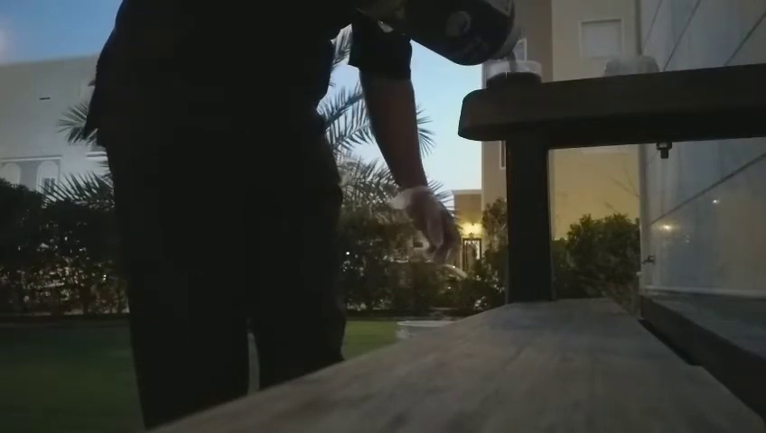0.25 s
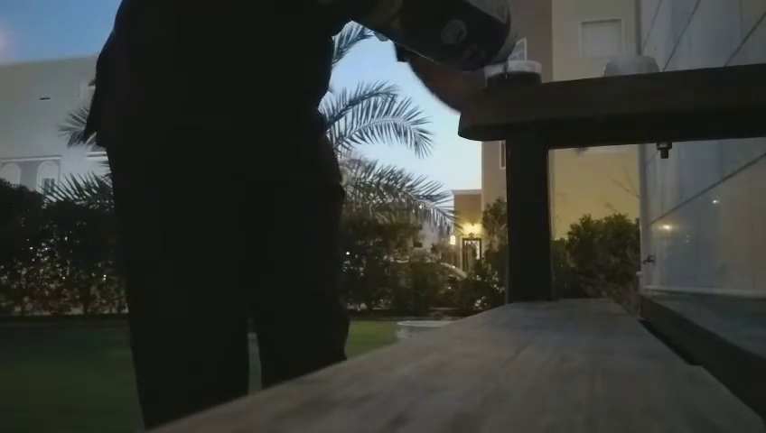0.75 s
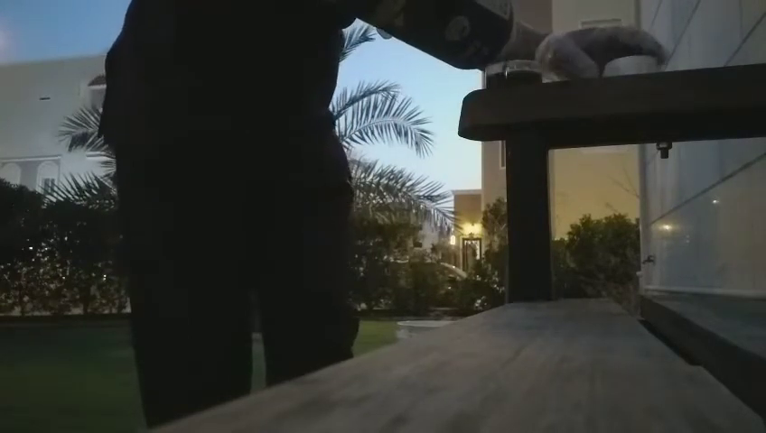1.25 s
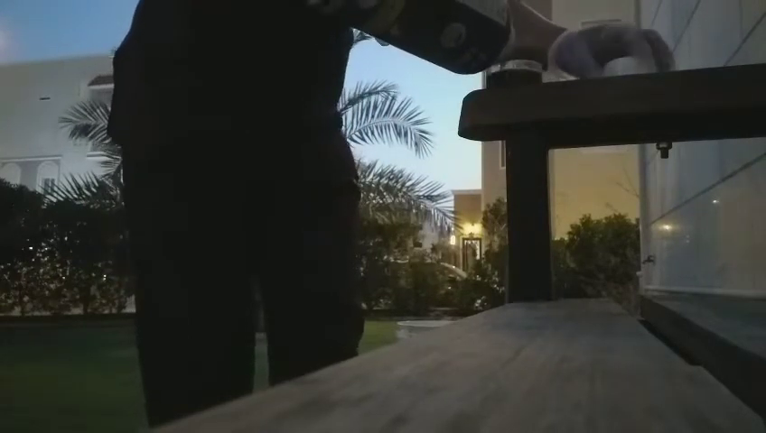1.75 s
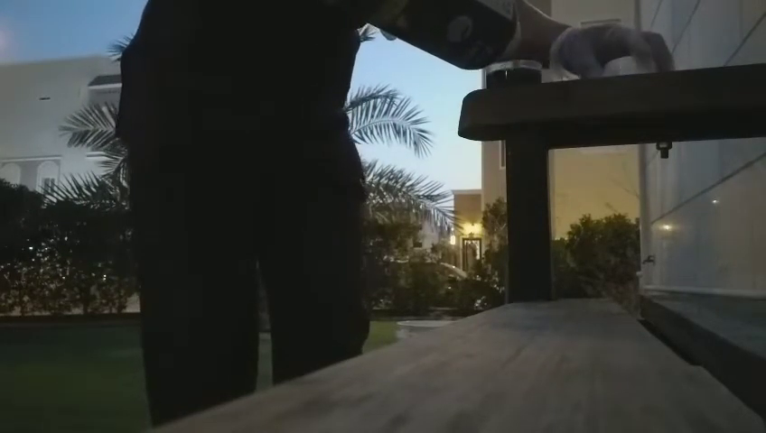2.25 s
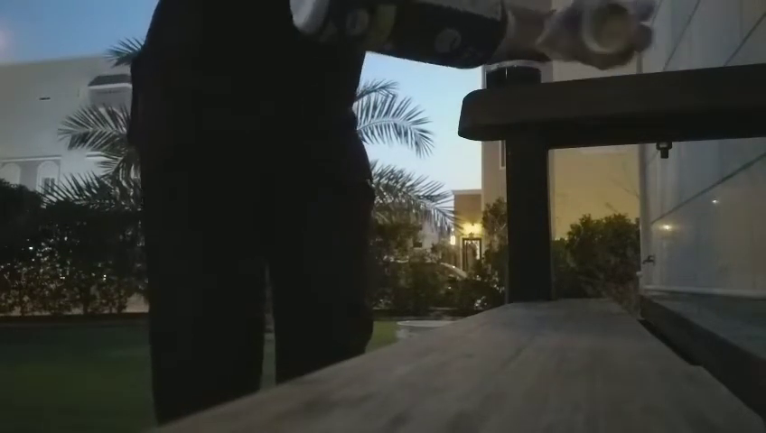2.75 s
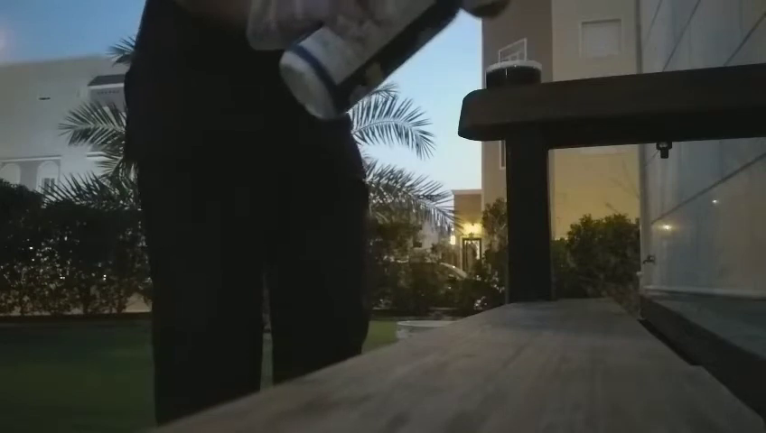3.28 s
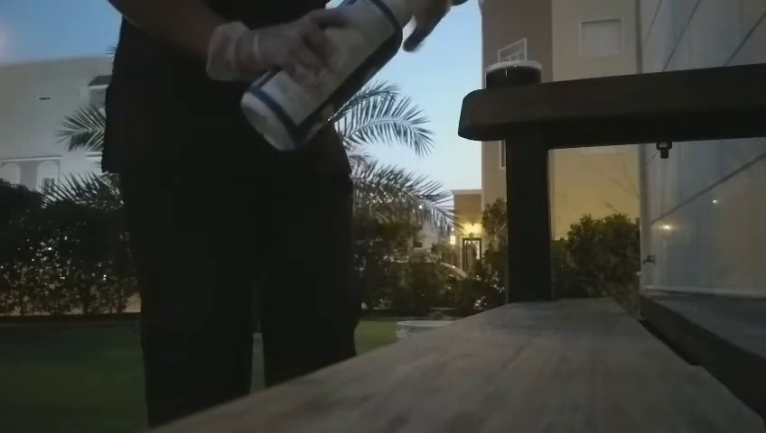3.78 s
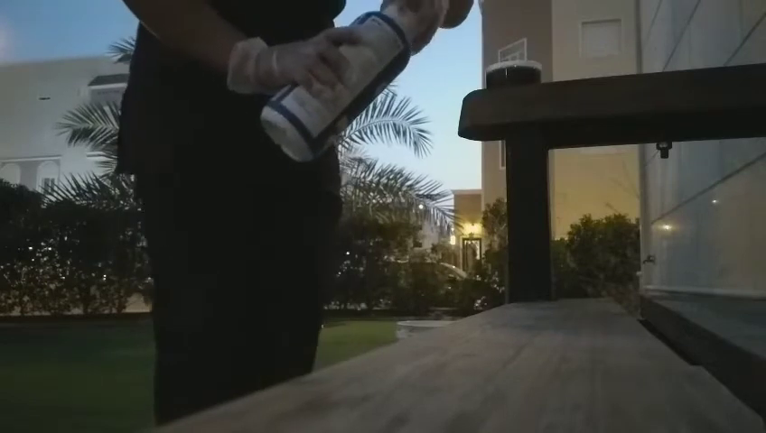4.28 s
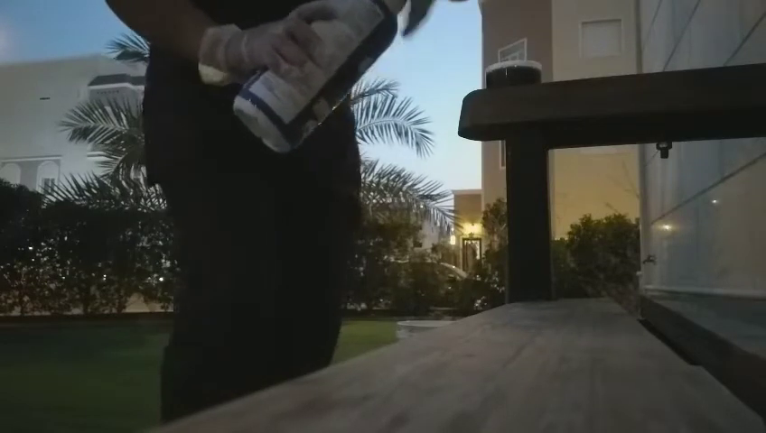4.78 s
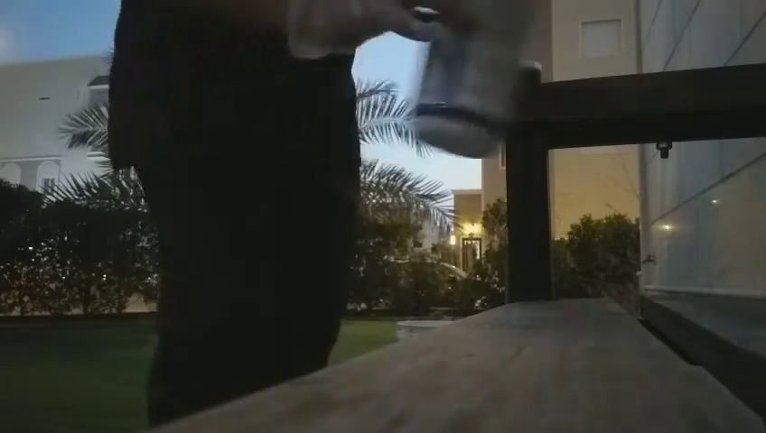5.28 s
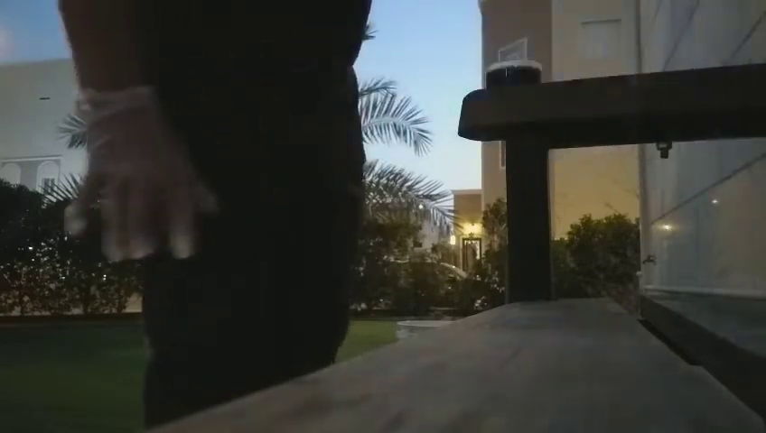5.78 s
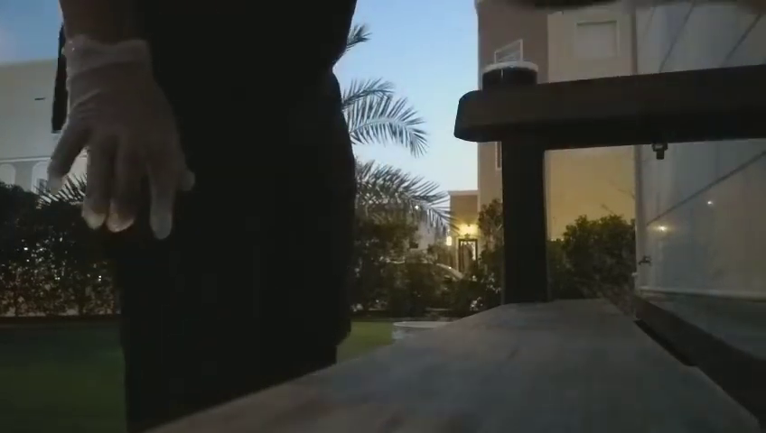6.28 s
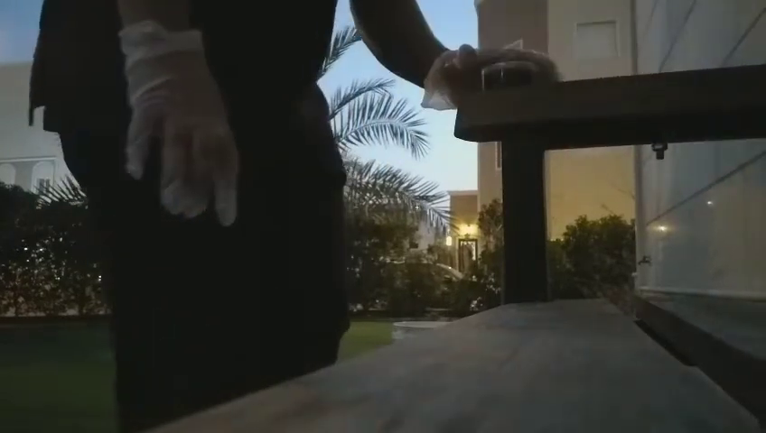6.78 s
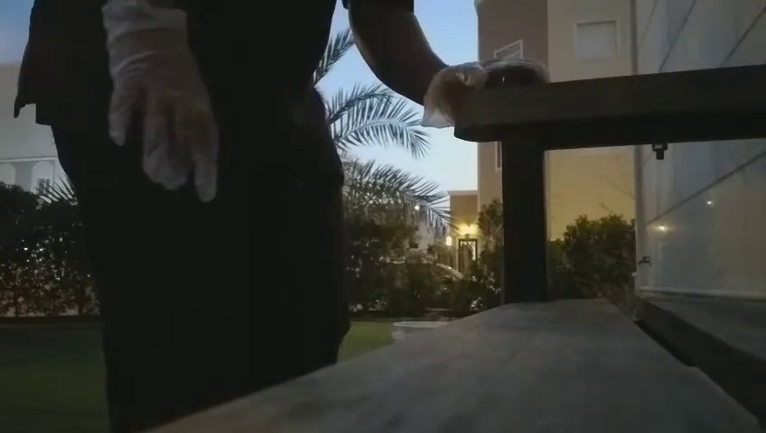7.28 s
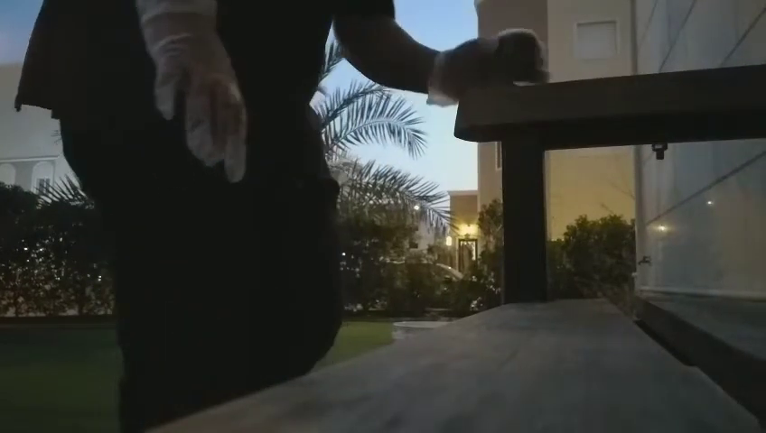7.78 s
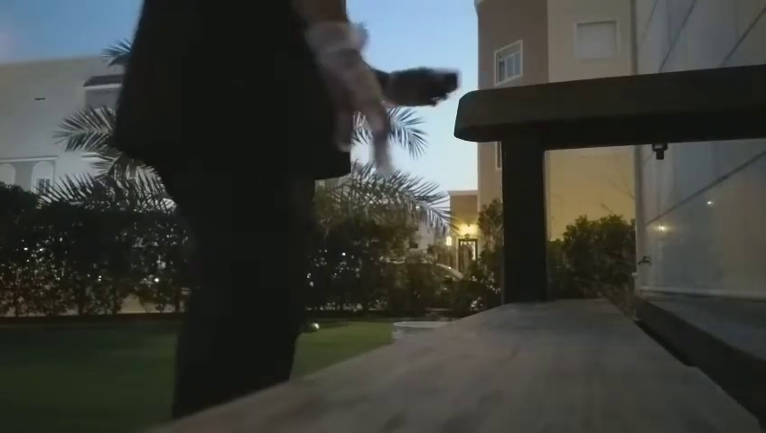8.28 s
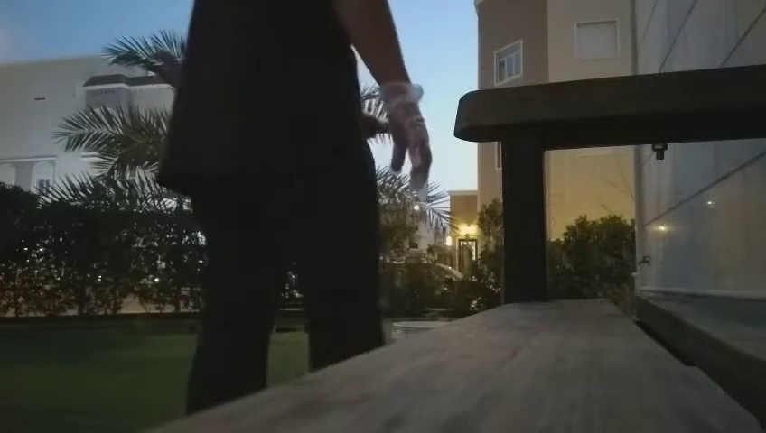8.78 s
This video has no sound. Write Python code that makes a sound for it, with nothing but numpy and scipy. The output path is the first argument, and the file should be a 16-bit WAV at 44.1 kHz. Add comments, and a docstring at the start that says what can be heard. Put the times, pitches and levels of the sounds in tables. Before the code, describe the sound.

A garden at dusk, with the microphone close to a wooden bench. From 0 s a jet-like turbine whines, fuzzy high tones around a thin whistle over rushing air and deep far rumble. It rises slightly, is strongest around 1.3-1.9 s, then drops in pitch and dissolves by about 2.8 s, a low drone coasting down with it. Rumble remains, with faint airy residue and low, beating fan hum. At 3.2-3.5 s a canister lid clicks, the sharpest at 3.48 s, ringing briefly and hollowly. Gritty glove rubbing and smaller clicks continue until 5.1 s. At 5.9 s the canister hits the planks: a loud, woody boom with hard bounces and fast rattling, then a short slide near 6.15 s. Background level ducks for about a second, then recovers. Soft foot scuffs come at 6.3, 7.8, 8.4-8.5 and 9 s over quiet hum and rumble.

```python
"""Garden turbine and a canister on a bench

A jet-like turbine, smeared blade tones over rushing air, whines above a far rumble, then winds down.
Beating tones of air-conditioner fans hum on. Near the microphone, gloved hands rub and twist the lid of
a canister (grainy noise) that clicks and rings; the canister lands on a wooden bench, which booms in
decaying modes. The knock ducks the recorder's gain for about a second, and feet scuff the ground."""
import sys
import numpy as np
from scipy import signal
from scipy.fft import rfft, irfft, next_fast_len
from scipy.io import wavfile
from scipy.ndimage import uniform_filter1d, minimum_filter1d, map_coordinates

SR = 44100
rng = np.random.default_rng(int(sys.argv[2]) if len(sys.argv) > 2 else 0)


def to_wav(s):
    """Save 16-bit WAV."""
    ch = np.atleast_2d(s).T  # columns
    pcm = np.round(np.clip(ch, -1, 1) * 32767)  # PCM
    wavfile.write(sys.argv[1], SR, pcm.astype(np.int16))


N = 399087
T = np.arange(N) / SR


def gain_of(db):
    """Decibels to amplitude."""
    return 10 ** (np.asarray(db) / 20)


def evened(x):
    """Scales to rms 1."""
    return x / np.sqrt(np.mean(x ** 2) + 1e-20)


def read(points, hz):
    """Reads a spectrum on a log-frequency axis."""
    f, value = np.transpose(points)
    return np.interp(np.log(hz + 1), np.log(f + 1), value)


def follow(rows):
    """Each column of a curve, at every sample."""
    s, *columns = np.transpose(rows)
    return [np.interp(T, s, c) for c in columns]


def add(mix, s, sound):
    """Mixes a sound in at time s."""
    part = mix[round(s * SR):][:len(sound)]
    part += sound[:len(part)]


def colour(x, spectrum):
    """Gives x a spectrum, at rms 1."""
    size = next_fast_len(len(x))
    shape = gain_of(read(spectrum, np.fft.rfftfreq(size, 1 / SR)))
    return evened(irfft(rfft(x, size) * shape, size)[:len(x)])


def band(x, hz, kind, order=2):
    """Causal low-pass or high-pass."""
    return signal.sosfilt(signal.butter(order, min(hz, SR / 2 - 1), kind, fs=SR, output="sos"), x)


def wander(per_s):
    """Smooth chance of rms 1 that changes about per_s times a second."""
    knots = rng.standard_normal(2 ** 14)
    return evened(map_coordinates(knots, [T * per_s], order=2, mode="wrap"))


def ring(modes, t):
    """Modes that lose 60 dB in their t60, each starting at a chance phase."""
    out = 0
    for hz, db, t60 in modes:
        out = out + gain_of(db - 60 * t / t60) * np.sin(2 * np.pi * (hz * t + rng.random()))
    return out


def stroke(centre, length, db):
    """A smooth rise and fall of level, such as one rubbing movement."""
    return gain_of(db) * np.cos(np.pi * np.clip((T - centre) / length, -.5, .5)) ** 2


# colour of the far roar: (frequency [Hz], relative density [dB per Hz])
RUMBLE_SPECTRUM = [(20, -29), (36, -22), (50, -4.5), (75, -4.5), (105, 3.5), (150, 2), (200, -1),
                   (380, -0.5), (520, -4), (640, -7), (1000, -12), (1250, -15), (2000, -21), (2700, -34.5),
                   (4200, -40.5), (5200, -54), (16000, -83.5)]
# the middle of the far roar: (time [s], level [dB])
ROAR_CURVE = [(0, -35), (1.76, -35), (2.9, -41), (5.8, -40.5), (7.4, -42.5), (9.05, -41.5)]


def rumble(bass_db=-40.0, split_hz=230, gust_db=-0.5, waver_db=1.92):
    """Far roar: the deep part holds nearly steady while the middle fades and wavers in the air."""
    level_db, = follow(ROAR_CURVE)
    noise = colour(rng.standard_normal(N), RUMBLE_SPECTRUM)
    deep = band(noise, split_hz, "low", order=3)
    middle = band(noise, split_hz, "high", order=3)
    deep_db = bass_db + gust_db * wander(8.1)
    middle_db = level_db + waver_db * wander(4.9)
    return deep * gain_of(deep_db) + middle * gain_of(middle_db)


# faint moans in the far roar: (frequency [Hz], width [Hz], centre time [s], length [s], level [dB])
MOAN_BANDS = [(529, 39, 0.41, 1.74, -43.5), (1490, 45, 0.22, 1.1, -52.5), (1670, 50, 1.27, 1.5, -53.5)]


def moans():
    """Narrow bands of noise in the roar that swell and sink."""
    out = np.zeros(N)
    for hz, width_hz, centre, length, db in MOAN_BANDS:
        swirl = band(rng.standard_normal(N) + 1j * rng.standard_normal(N), width_hz, "low")
        moan = evened((swirl * np.exp(2j * np.pi * hz * T)).real)
        out += moan * stroke(centre, length, db)
    return out


# colour of the rushing air: (frequency [Hz], relative density [dB per Hz])
RUSH_SPECTRUM = [(400, -7.5), (1000, -1.5), (1800, 8), (2800, 7), (4200, 2.5), (6000, -8.5), (9100, -13.5),
                 (10200, -33), (12500, -30.5), (15000, -50)]
# the turbine's run: (time [s], blade rate [Hz], whine level [dB], rush level [dB])
TURBINE_RUN = [(0, 2315, -49, -48.5), (.45, 2362, -45, -47), (1.1, 2405, -46.5, -45.5),
               (1.36, 2420, -41.5, -44), (1.72, 2396, -44, -47.5), (1.9, 2345, -41.5, -48),
               (2.04, 2055, -44.5, -46), (2.18, 1935, -48, -51.5), (2.33, 1760, -55.5, -54),
               (2.8, 1720, -71, -58.5), (3.25, 2010, -62, -57.5), (4.2, 1955, -67, -62),
               (5.15, 1893, -66.5, -68.5), (5.7, 1810, -81, -72), (9.05, 1800, -96, -73)]
FULL_HZ, FULL_DB = 2410, -41.5  # blade rate and whine level at full power
# top of the rush at full power [dB]; dB lost per dB of whine; what remains [dB]
TOP_DB, TOP_SLOPE, TOP_FLOOR_DB = -48.5, 0.83, -92


def rush(split_hz=5000):
    """Turbulent air; its top dies with the whine as the turbine slows."""
    _, whine_db, rush_db = follow(TURBINE_RUN)
    top_gain = gain_of(TOP_DB + TOP_SLOPE * (whine_db - FULL_DB))
    top_gain = np.hypot(top_gain, gain_of(TOP_FLOOR_DB))
    noise = colour(rng.standard_normal(N), RUSH_SPECTRUM)
    body = band(noise, split_hz, "low", order=5)
    top = evened(band(noise, split_hz, "high", order=5))
    return (body * gain_of(rush_db) + top * top_gain) * gain_of(0.47 * wander(14))


CORE_DB, CORE_SLOPE = -45.5, 1.6  # clean whistle at full power [dB]; dB lost per dB of whine
BLADE_DB, BLADE_SLOPE = -59.5, 12  # deepest blade tone at full speed [dB]; dB lost per dB of speed
# the deepest tone swells once, near top speed
BLADE_SWELL_S, BLADE_SWELL_LENGTH_S, BLADE_SWELL_DB = 1.3, 0.54, -51


def whine(width_hz=145, third_db=-7.0, third_fade=1.0, broken_hz=280, firm_db=-45):
    """Blade tones smeared by turbulence, with a thin clean core that needs full power."""
    blade_hz, level_db, _ = follow(TURBINE_RUN)
    phase = 2 * np.pi * np.cumsum(blade_hz * (1 + 0.0037 * wander(18))) / SR

    def smeared(order, spread_hz):
        """A fuzzy whistle on one multiple of the blade rate."""
        swirl = rng.standard_normal(N) + 1j * rng.standard_normal(N)
        swirl = band(swirl, spread_hz, "low", order=1)
        swirl = band(swirl, 3 * spread_hz, "low", order=1)
        return evened((swirl * np.exp(1j * order * phase)).real)

    # the upper tone is lost once the whine is weak
    upper_db = third_db + third_fade * np.minimum(level_db + 59, 0)
    upper_gain = gain_of(upper_db + 1.05 * wander(14.1))
    tones = smeared(order=2, spread_hz=width_hz)
    tones = tones + upper_gain * smeared(order=3, spread_hz=0.89 * width_hz)
    # a weak whine dissolves into a wide band
    breakup = np.clip((firm_db - level_db) / 12, 0, .85)
    tones = np.sqrt(1 - breakup) * tones + np.sqrt(breakup) * smeared(order=2, spread_hz=broken_hz)
    core_db = CORE_DB + CORE_SLOPE * (level_db - FULL_DB) + 2.8 * wander(12)
    first_db = BLADE_DB + BLADE_SLOPE * 20 * np.log10(blade_hz / FULL_HZ) + 3.3 * wander(8.9)
    first_gain = gain_of(first_db) * (1 - breakup)
    first_gain = first_gain + stroke(BLADE_SWELL_S, BLADE_SWELL_LENGTH_S, BLADE_SWELL_DB)
    core = gain_of(core_db) * np.sin(2 * phase) + first_gain * np.sin(phase)
    return tones * gain_of(level_db + 1.53 * wander(16)) + np.sqrt(2) * core


# the drone holds, then coasts down and shakes hardest as it passes a resonance
DRONE_HZ, DRONE_DB = 103.3, -49.5
COAST_FROM_S, COAST_S, COAST_DB_PER_S = 2.03, .66, 27  # start, time constant, loss
SHAKE_HZ, SHAKE_WIDTH_HZ, SHAKE_DB = 72, 16, 13.5


def drone(waver_hz=3, flutter_db=3.0):
    """A low tone that coasts down as the whine falls, swelling through a resonance on the way."""
    coasting = np.maximum(T - COAST_FROM_S, 0)
    hz = DRONE_HZ * np.exp(-coasting / COAST_S)
    shake_db = SHAKE_DB * np.exp(-((hz - SHAKE_HZ) / SHAKE_WIDTH_HZ) ** 2)
    level_db = DRONE_DB - COAST_DB_PER_S * coasting + shake_db
    tone = np.sin(2 * np.pi * np.cumsum(hz + waver_hz * wander(21.6)) / SR)
    return np.sqrt(2) * tone * gain_of(level_db + flutter_db * wander(14))


# hum of the air conditioner, compressor (first two rows) and fans: (frequency [Hz], waver [Hz], level outside
# the swell [dB], swell start [s], swell end [s])
HUM_TONES = [(53.5, 0.55, -66.5, 2.8, 4.9), (108.4, 3.1, -59, 2.2, 8.0), (253.4, 2.317, -54.5, 1.1, 8.4),
             (257.2, 1.16, -52, 1.2, 8.84), (313.8, 3.184, -53, 1.4, 4.9), (318.6, 1.69, -53.5, 1.2, 7.94)]
SWELL_DB, SWELL_S = 6.0, .15  # how far a hum tone swells, and how quickly


def hums(flutter_db=2.5):
    """Compressor and fan tones, the fans' in close pairs that beat; each swells, holds and sinks back."""
    out = np.zeros(N)
    for hz, waver_hz, db, start, end in HUM_TONES:
        swell = (np.tanh((T - start) / SWELL_S) - np.tanh((T - end) / SWELL_S)) / 2
        tone = np.sin(2 * np.pi * np.cumsum(hz + waver_hz * wander(12)) / SR)
        out += np.sqrt(2) * tone * gain_of(db + SWELL_DB * swell + flutter_db * wander(9))
    return out


# stereo width by band: (frequency [Hz], side against centre [dB])
SIDE_SPECTRUM = [(380, -66), (700, -56), (1290, -21), (2300, -11.5), (4000, -56), (8000, -31.5),
                 (15000, -19)]


def side_copy(x, spectrum, delay_s):
    """A delayed, filtered copy, for use opposite in the two channels; the spectrum is its gain in dB."""
    size = next_fast_len(N)
    hz = np.fft.rfftfreq(size, 1 / SR)
    response = gain_of(read(spectrum, hz)) * np.exp(-2j * np.pi * hz * delay_s)
    return irfft(rfft(x, size) * response, size)[:N]


# hissy colour of glove and lid: (frequency [Hz], relative density [dB per Hz])
HISS_SPECTRUM = [(3000, -10), (5500, -11), (7500, 3.5), (9200, 6.5), (10500, -6), (12000, -4), (14000, 1),
                 (15800, -3)]
# gritty colour of hard contact: (frequency [Hz], relative density [dB per Hz])
GRIT_SPECTRUM = [(400, -31), (1000, 1), (2000, 5), (2900, -2.5), (4100, -5.5), (5200, -14.5), (8800, -14),
                 (10500, -43), (16000, -49)]
# lid clicks: (time [s], level [dB], treble against that level [dB], hollow note level [dB])
LID_CLICKS = [(3.2434, -32.5, -36, -33), (3.4451, -25.5, -11, -36), (3.4808, -12, -23, -29),
              (3.5098, -29, -32, -51), (3.984, -40, -28, -60), (4.322, -43, -14, -54),
              (4.426, -37, -22, -58), (4.7103, -39, -24, -57), (4.749, -53, -4, -72), (5.093, -51, 3, -70)]
# ringing wall of the canister: (frequency [Hz], relative level [dB], t60 [s])
CANISTER_MODES = [(1170, -17.5, 0.016), (1495, -4, .022), (1730, 6.5, 0.02), (1713, 3, 0.023),
                  (2370, -6.5, 0.048), (2910, -8, 0.036), (4170, -8.5, 0.035), (4500, -20, 0.028)]
# the air inside it: (frequency [Hz], relative level [dB], t60 [s])
HOLLOW_MODES = [(572, 3.5, 0.087)]


def clicks(ring_db=-5, snap_db=-7, snap_s=0.0036, tail=0.12, tail_s=0.023):
    """Each click of the lid is a short snap that rings the canister's wall and the air inside."""
    out, t = np.zeros(N), np.arange(SR // 5) / SR
    fall = np.exp(-t / snap_s) + tail * np.exp(-t / tail_s)
    onset = 1 - np.exp(-t / 0.00042)
    for s, db, treble_db, hollow_db in LID_CLICKS:
        crack = colour(rng.standard_normal(len(t)), GRIT_SPECTRUM) * gain_of(snap_db)
        fizz = colour(rng.standard_normal(len(t)), HISS_SPECTRUM) * gain_of(treble_db)
        wall = gain_of(db) * (gain_of(ring_db) * ring(CANISTER_MODES, t) + (crack + fizz) * fall)
        hollow = gain_of(hollow_db) * ring(HOLLOW_MODES, t)
        add(out, s, (wall + hollow) * onset)
    return out


def walls(x, t60=1.0, dull_hz=5000):
    """Faint scattered echoes from the house walls."""
    t = np.arange(SR * 3 // 4) / SR
    sparse = rng.standard_normal(len(t)) * (rng.random(len(t)) < .05)
    taps = sparse * (t > .012) * 1000 ** (-t / t60)
    taps = band(taps / np.linalg.norm(taps), dull_hz, "low", order=1)
    return signal.oaconvolve(x, taps)[:N]


# the glove rubbing and twisting the lid: (centre time [s], length [s], hiss level [dB], grit level [dB])
LID_RUBS = [(3.47, 0.19, -69, -46), (3.73, 0.39, -58.5, -51.5), (4.095, 0.24, -56.5, -45.5),
            (4.436, .28, -60, -49.5), (4.706, .13, -62, -59), (4.765, .11, -46, -58),
            (4.894, .12, -55.5, -62), (4.986, .28, -63.5, -64), (5.113, 0.099, -46.5, -61)]
# feet on the ground: (centre time [s], length [s], level [dB])
FOOT_SCUFFS = [(6.328, 0.19, -50.5), (7.79, .09, -64), (8.415, 0.14, -51.5), (8.517, 0.093, -56),
               (8.98, .28, -61)]
# the canister slides after landing: (centre time [s], length [s], hiss level [dB], grit level [dB])
SLIDE = (6.15, 0.34, -61, -51)
# a hard rub fizzes above an edge; its share of the hiss, and the hiss level where it has that share
FIZZ_HZ, FIZZ_DB, FIZZ_FROM_DB = 11000, -2, -48


def friction(grain_db=3.0, grains_per_s=3500, catch_db=3.0, sole_hz=6000, sole_share=.5):
    """Tiny slips catch in clumps, hissy from glove, gritty from lid or bench; soles scuff more softly."""
    rubs = list(LID_RUBS) + [SLIDE]
    hiss = sum(stroke(s, length, db) for s, length, db, _ in rubs)
    grit = sum(stroke(s, length, db) for s, length, _, db in rubs)
    strength = gain_of(grain_db * np.minimum(rng.exponential(1, N), 5))
    slips = rng.standard_normal(N) * strength * (rng.random(N) < grains_per_s / SR)
    slips *= gain_of(catch_db * wander(110))
    glove, grains = colour(slips, HISS_SPECTRUM), colour(slips, GRIT_SPECTRUM)
    fizz = band(colour(rng.standard_normal(N), HISS_SPECTRUM), FIZZ_HZ, "high", order=4)
    fizz = fizz * gain_of(FIZZ_DB) * hiss / gain_of(FIZZ_FROM_DB)  # grows with the force of the rub
    soles = sole_share * grains + colour(rng.standard_normal(N), GRIT_SPECTRUM)
    soles = evened(band(soles, sole_hz, "low"))
    scuffs = sum(stroke(*row) for row in FOOT_SCUFFS)
    return hiss * (glove + fizz) + grit * grains + scuffs * soles


# colour of the thud: (frequency [Hz], relative density [dB per Hz])
THUD_SPECTRUM = [(25, -30), (60, -3), (110, -5.5), (170, -3), (230, -2), (480, -2), (700, -6.5),
                 (1400, -10.5), (2000, -17), (2700, -32.5), (4200, -38), (6000, -41.5), (8500, -48),
                 (10500, -56), (12500, -54), (15500, -62)]
# how long the thud lasts: (frequency [Hz], t60 [s])
THUD_DECAY = [(60, 0.29), (300, 0.38), (1000, 0.19), (2500, 0.18), (12000, 0.091)]
# the bench under the blow: (frequency [Hz], relative level [dB], t60 [s])
BENCH_MODES = [(127.7, 2.5, 0.28), (171, -1, 0.23), (252.5, 3.5, 0.3), (369, -15, 0.55), (477, -4.5, 0.32),
               (613, 0, 0.26), (725, -2.5, 0.23), (790, -13, 0.23), (875, -5, 0.28), (978, -19, 0.22),
               (1080, -3, 0.2), (1235, -2, 0.13), (1310, -2, 0.12), (1418, -6, 0.099), (1557, -6, 0.13),
               (1620, -2, 0.16), (1810, -21, .25), (2043, -22, 0.15), (2200, -28, .2)]
KNOCK_S = 5.891


def knock(modes_db=-6, thud_db=-4.5, chatter_s=0.036):
    """The canister chatters on the planks, which boom and ring."""
    out, t = np.zeros(N), np.arange(SR * 3 // 4) / SR
    hz, at, z = signal.stft(colour(rng.standard_normal(len(t)), THUD_SPECTRUM), SR, nperseg=256)
    # the thud holds through the chatter, then each band dies at its own rate
    fall_db = -60 * np.maximum(at - chatter_s, 0) / read(THUD_DECAY, hz)[:, None]
    thud = signal.istft(z * gain_of(fall_db), SR, nperseg=256)[1][:len(t)]
    boom = ring(BENCH_MODES, t) * (1 - np.exp(-t / 0.0041))
    # the first contact shoves the plank
    blow = 1.6 * np.sin(2 * np.pi * 330 * t) * np.exp(-t / 0.0023)
    wood = blow + gain_of(thud_db) * thud + gain_of(modes_db) * boom
    wood = wood * (1 - np.exp(-t / 0.000087))
    add(out, KNOCK_S, band(wood, 76, "high", order=3))
    return out


# colour of a loose tick: (frequency [Hz], relative density [dB per Hz])
TICK_SPECTRUM = [(600, -10), (2000, 15), (4200, 0.5), (5500, -3), (8400, 5.5), (10500, -13), (12500, 0),
                 (14500, -8), (15800, -15)]
# hard bounces of the canister: (time [s], level [dB])
CANISTER_BOUNCES = [(5.8918, -21), (5.905, -16.5), (5.938, -19.5), (5.9618, -18.5), (6.0058, -20),
                    (6.14, -35)]
# small ticks between them die away
RATTLE_DB, RATTLE_DB_PER_S, RATTLE_GAP_S, RATTLE_SPREAD_DB = -20.5, 88, .02, 4


def rattle(tick_s=0.00076, tail=0.11, tail_s=0.02, count=19):
    """A few hard bounces, and uneven ticks of loose parts that fade as the canister settles."""
    out, t = np.zeros(N), np.arange(SR // 20) / SR
    fall = np.exp(-t / tick_s) + tail * np.exp(-t / tail_s)
    jitter, strength = rng.uniform(-1, 1, (count, 2)).T
    after = RATTLE_GAP_S * (np.arange(count) + 1 + jitter / 2)
    loose_db = RATTLE_DB - RATTLE_DB_PER_S * after + RATTLE_SPREAD_DB * strength
    for s, db in list(CANISTER_BOUNCES) + list(zip(KNOCK_S + after, loose_db)):
        tick = colour(rng.standard_normal(len(t)), TICK_SPECTRUM) * fall
        add(out, s, gain_of(db) * tick)
    return out


def scene():
    """Nearly all is central; some bands have a little stereo width; the lid sits slightly left."""
    lid = clicks()
    near = friction() + knock() + rattle()
    far = rumble() + rush() + moans()
    # the wall alongside combs the distant roar
    far = 0.96 * far + 0.13 * np.interp(T - .0096, T, far, left=0)
    centre = far + whine() + drone() + hums() + near + gain_of(-27.0) * walls(near + lid)
    side = side_copy(centre + lid, SIDE_SPECTRUM, delay_s=.0023)
    return centre + lid * gain_of([[.8], [-.8]]) + np.array([side, -side])


# microphone preamp hiss: (frequency [Hz], relative density [dB per Hz])
PREAMP_SPECTRUM = [(100, -15), (8700, 4), (10000, -3), (13000, 5), (15500, -4.5)]
EDGE_HZ = 15700  # upper band limit


def record(dry, threshold_db=-17, most_db=7, hold_s=1.0, release_db=22, hiss_db=-77.5, apart_db=-8,
           whistle_db=-81):
    """Preamp hiss and whistles; gain control that drops at once, holds, then recovers; the band limit."""
    shared = colour(rng.standard_normal(N), PREAMP_SPECTRUM)
    apart = np.array([colour(rng.standard_normal(N), PREAMP_SPECTRUM) for _ in dry])
    hiss = shared + gain_of(apart_db) * apart
    whistles = np.sin(2 * np.pi * 12522 * T) + .18 * np.sin(2 * np.pi * 8624 * T)
    x = dry + gain_of(hiss_db) * hiss + gain_of(whistle_db) * evened(whistles)

    power_db = 10 * np.log10(abs(uniform_filter1d((x ** 2).mean(0), size=900)) + 1e-12)
    over_db = np.clip(power_db - threshold_db, 0, most_db)
    hold = int(hold_s * SR) // 2
    held_db = -minimum_filter1d(-over_db, 2 * hold + 1, origin=hold, mode="constant")
    # recovery at release_db per second
    duck_db = np.maximum.accumulate(held_db + release_db * T) - release_db * T
    x = x * gain_of(-uniform_filter1d(duck_db, size=100))

    # a fast limiter rounds off the peaks that remain
    excess = -minimum_filter1d(-np.maximum(abs(x).max(0) / .95, 1), size=161)
    x = x / uniform_filter1d(excess, size=161)
    low_pass = signal.firwin(511, EDGE_HZ, window=("kaiser", 9), fs=SR)
    return signal.oaconvolve(x, low_pass[None], "same")


dry = scene()
out = record(dry)
to_wav(out)
```